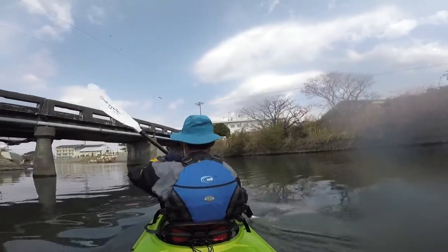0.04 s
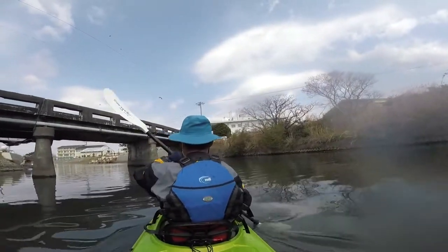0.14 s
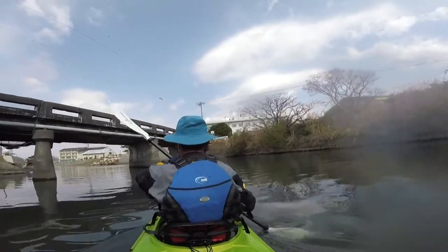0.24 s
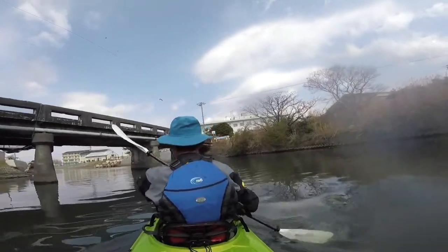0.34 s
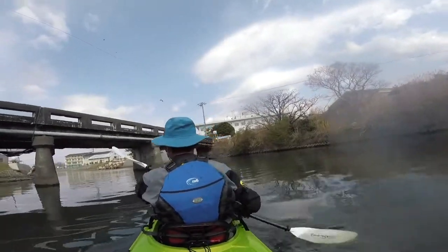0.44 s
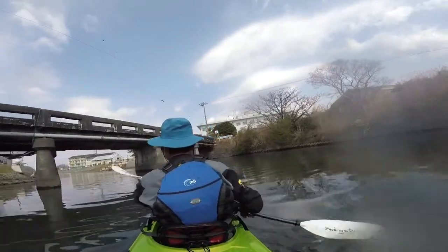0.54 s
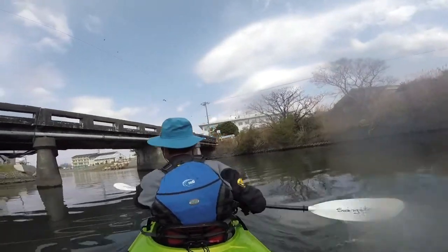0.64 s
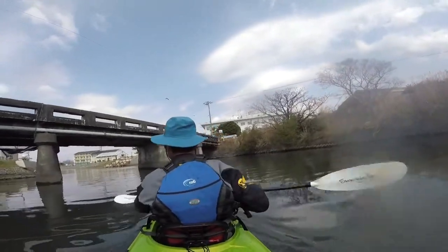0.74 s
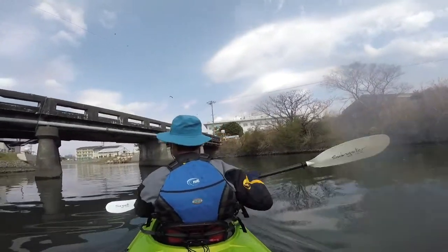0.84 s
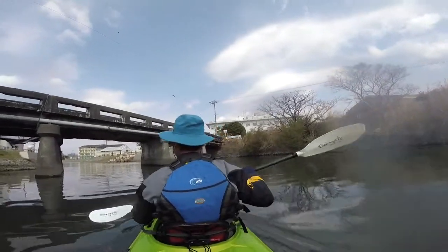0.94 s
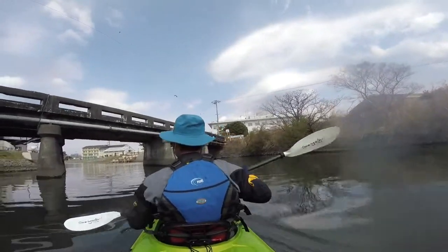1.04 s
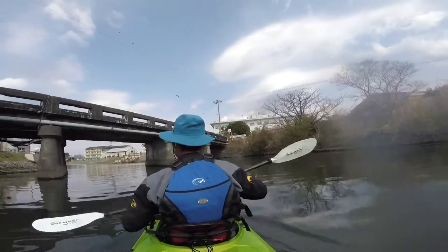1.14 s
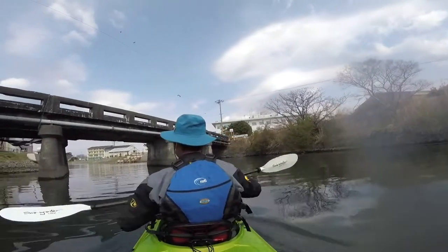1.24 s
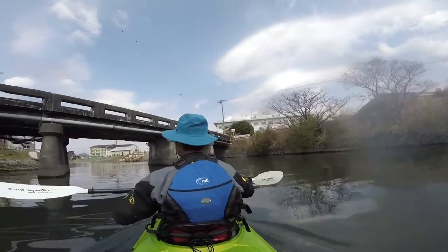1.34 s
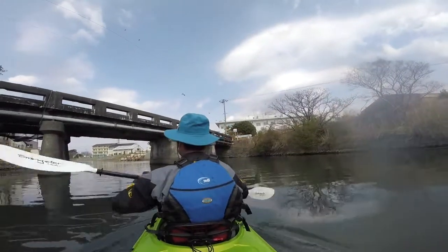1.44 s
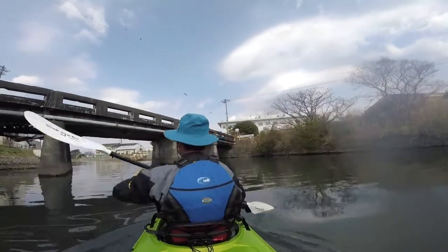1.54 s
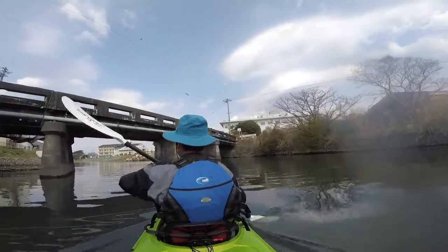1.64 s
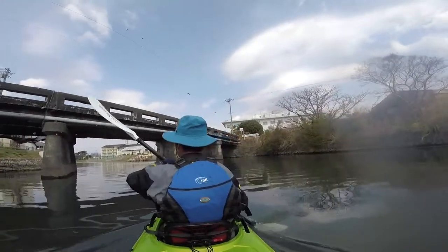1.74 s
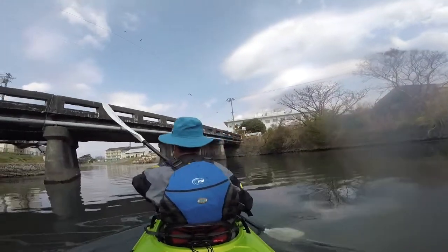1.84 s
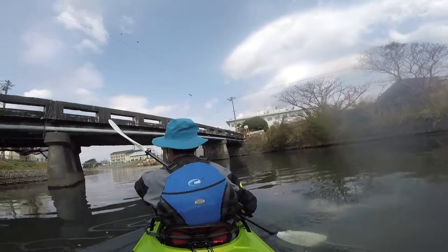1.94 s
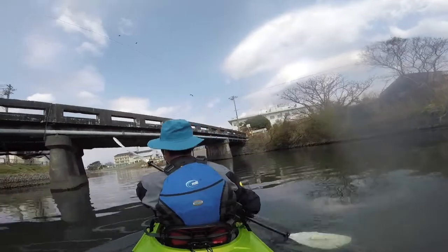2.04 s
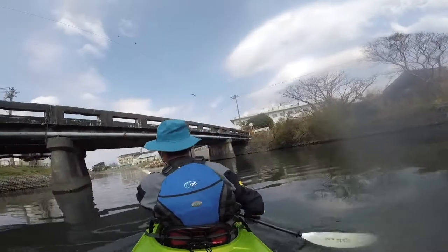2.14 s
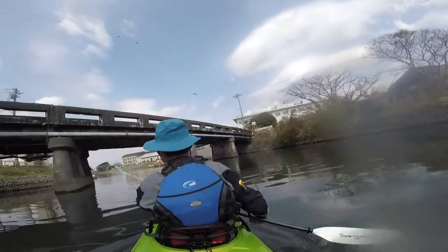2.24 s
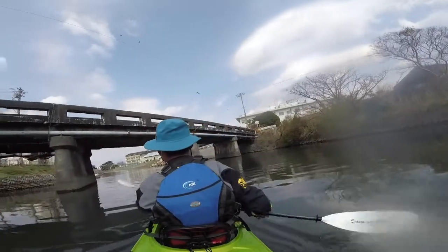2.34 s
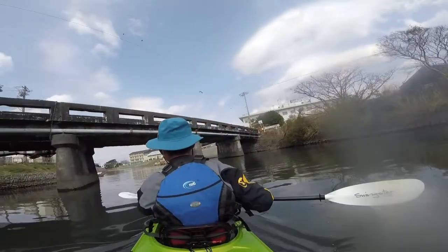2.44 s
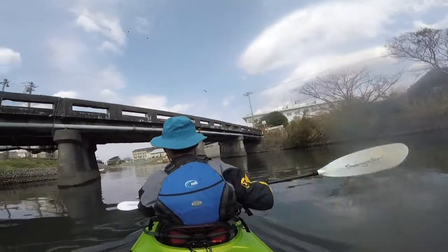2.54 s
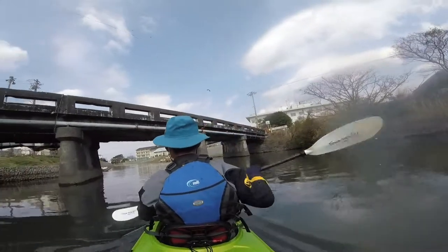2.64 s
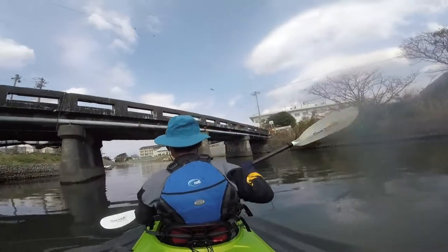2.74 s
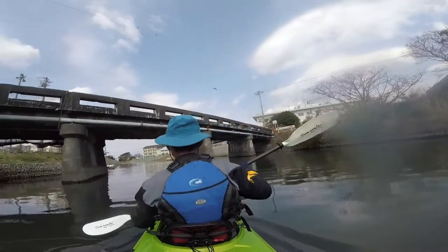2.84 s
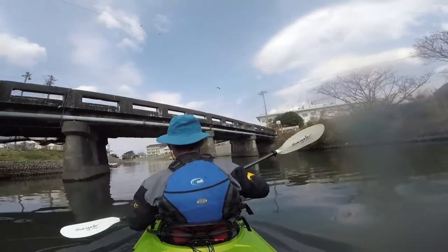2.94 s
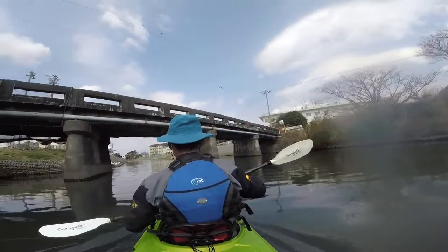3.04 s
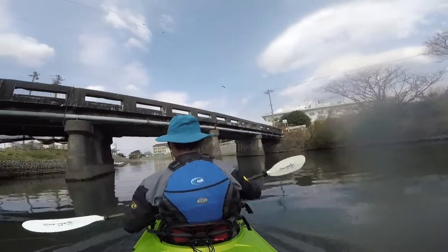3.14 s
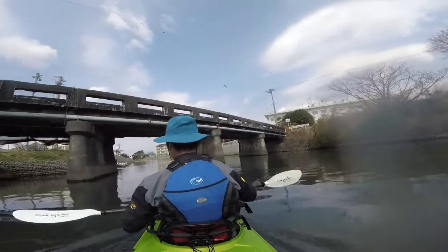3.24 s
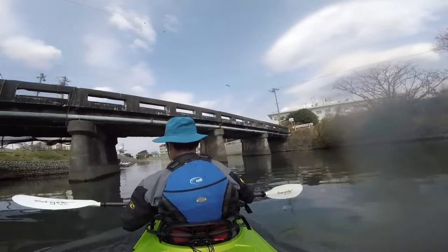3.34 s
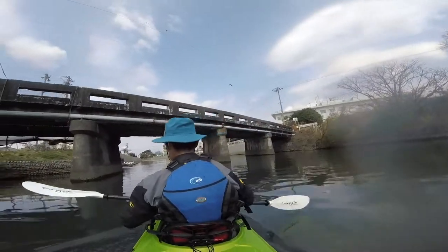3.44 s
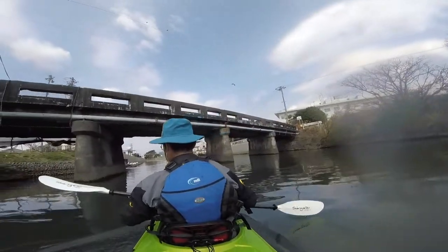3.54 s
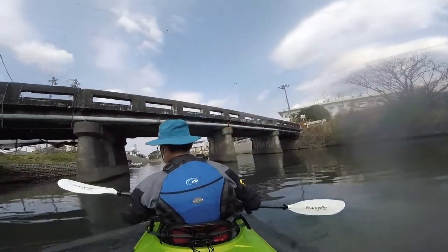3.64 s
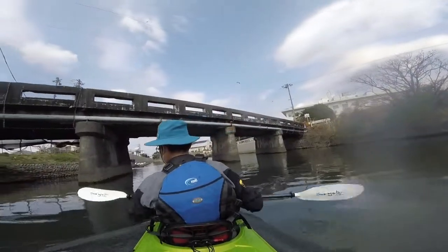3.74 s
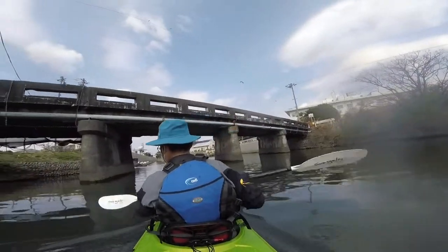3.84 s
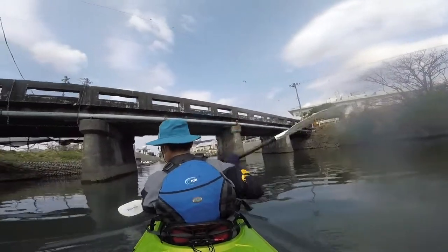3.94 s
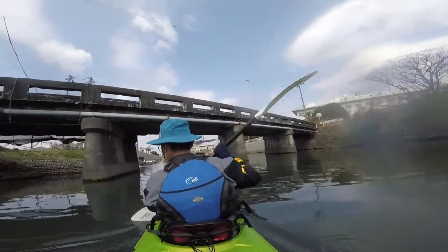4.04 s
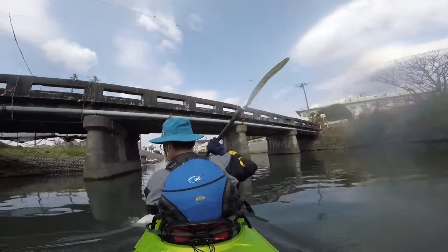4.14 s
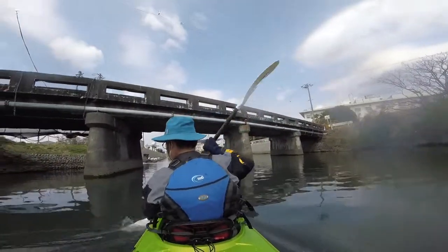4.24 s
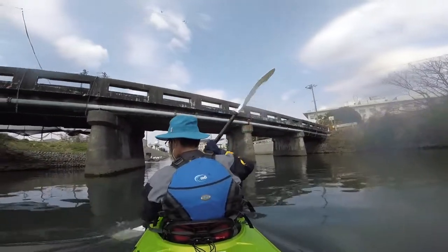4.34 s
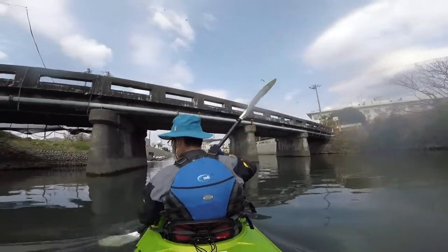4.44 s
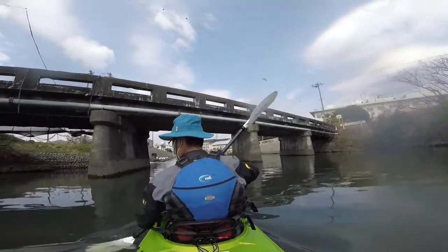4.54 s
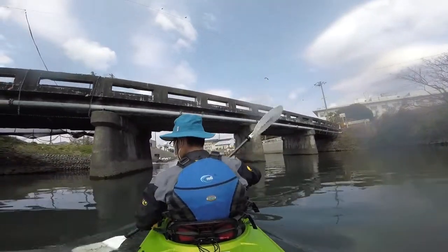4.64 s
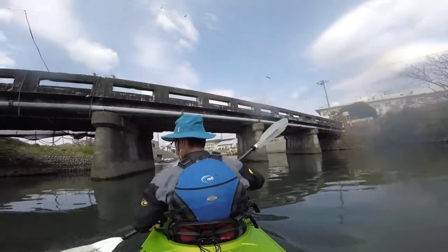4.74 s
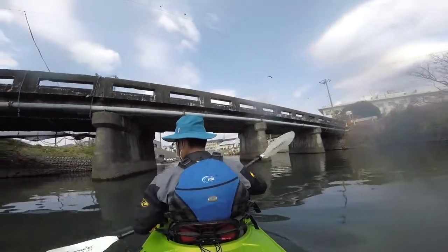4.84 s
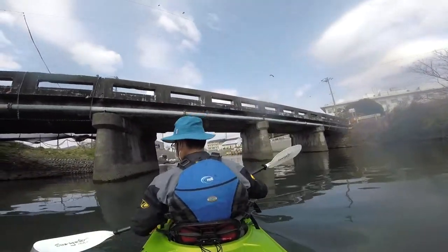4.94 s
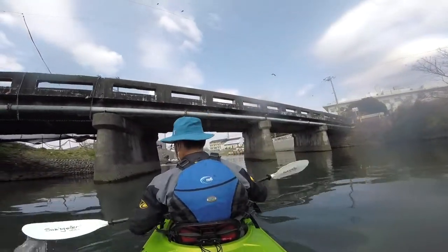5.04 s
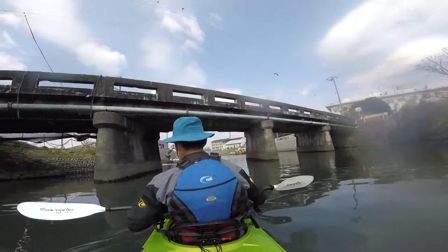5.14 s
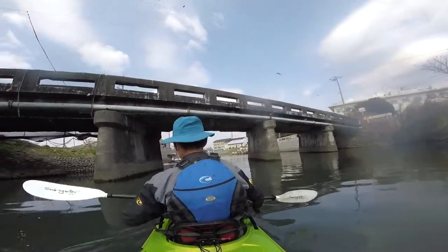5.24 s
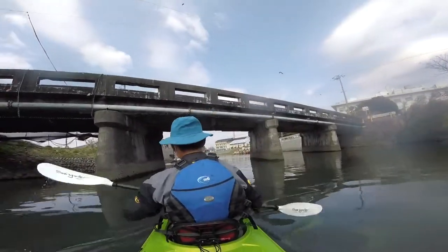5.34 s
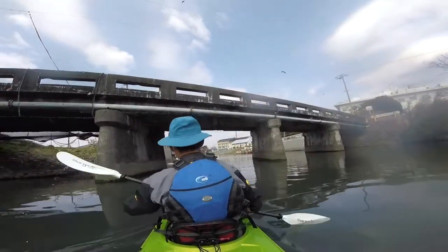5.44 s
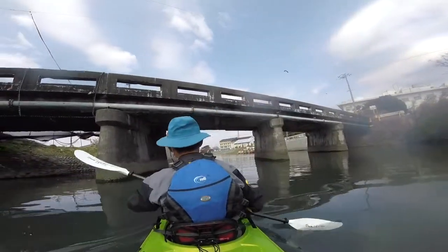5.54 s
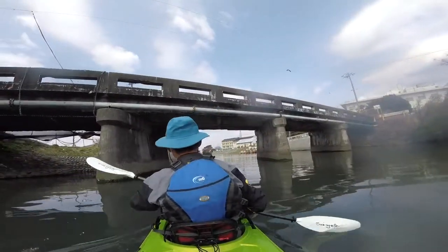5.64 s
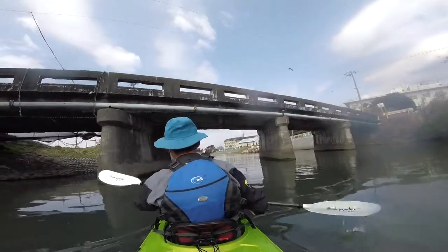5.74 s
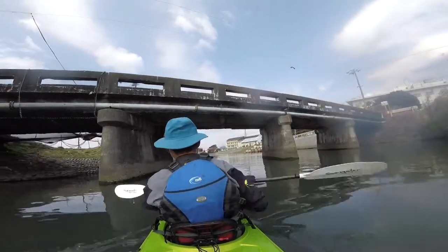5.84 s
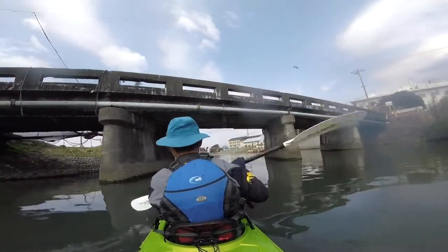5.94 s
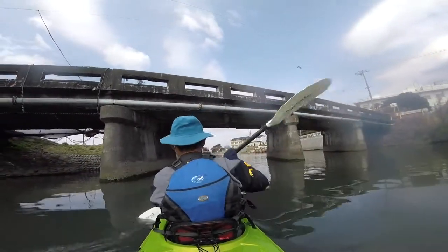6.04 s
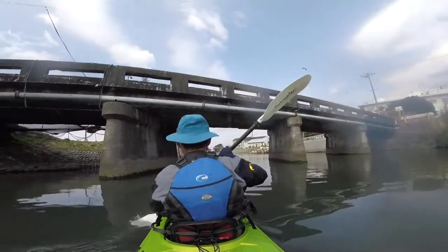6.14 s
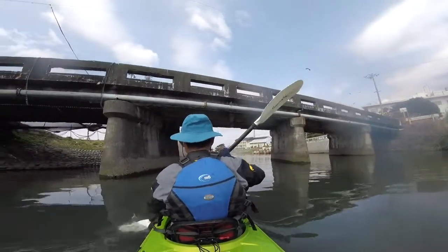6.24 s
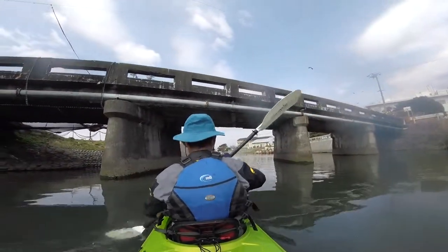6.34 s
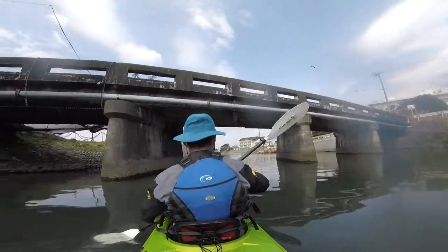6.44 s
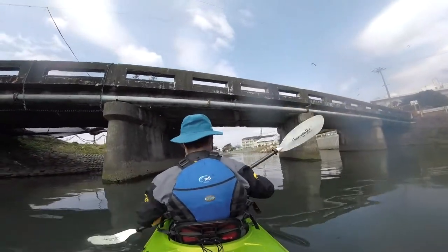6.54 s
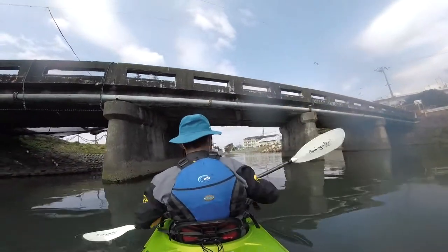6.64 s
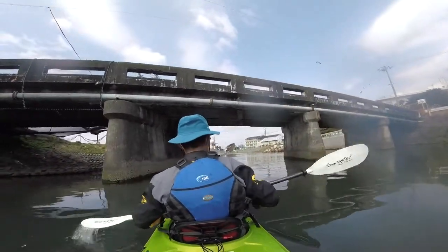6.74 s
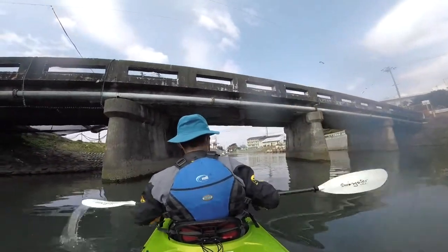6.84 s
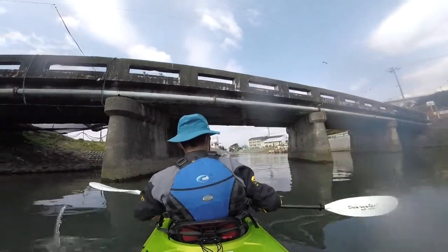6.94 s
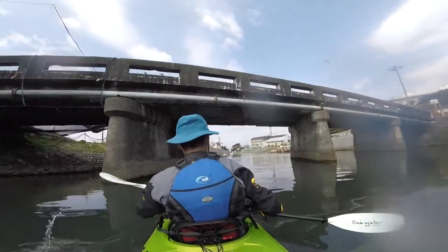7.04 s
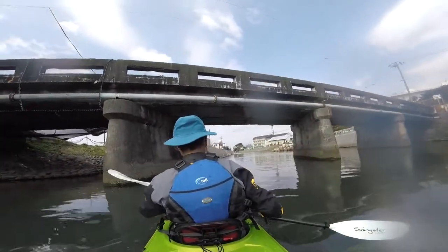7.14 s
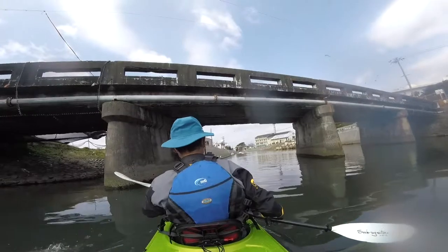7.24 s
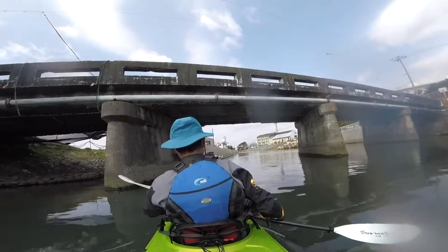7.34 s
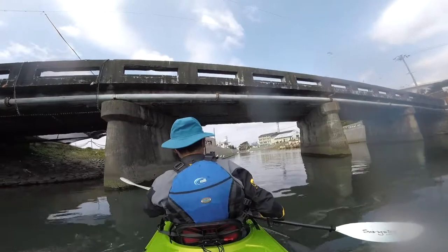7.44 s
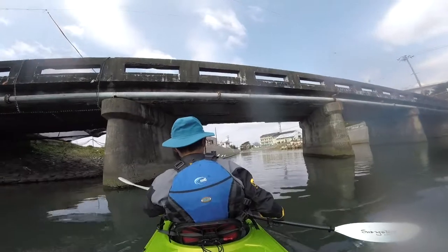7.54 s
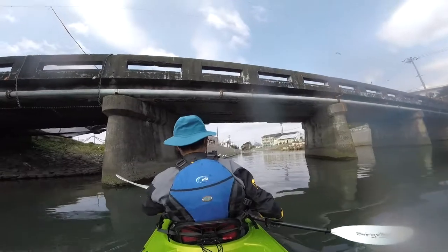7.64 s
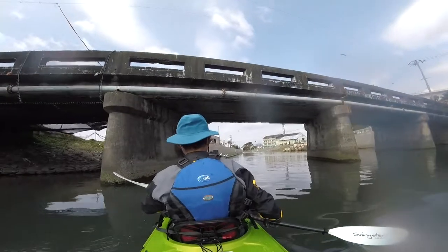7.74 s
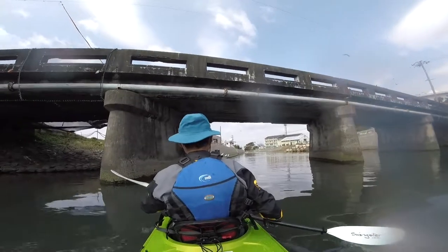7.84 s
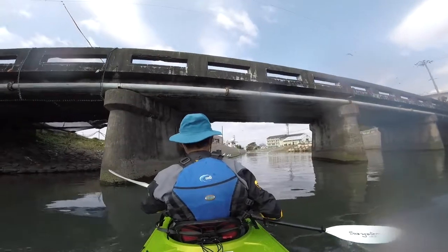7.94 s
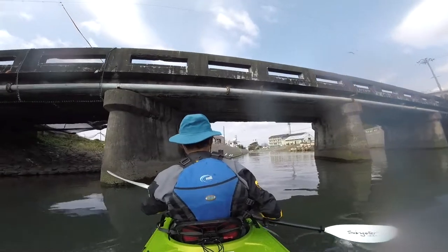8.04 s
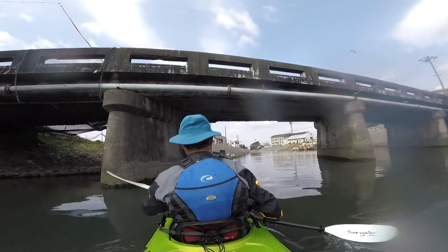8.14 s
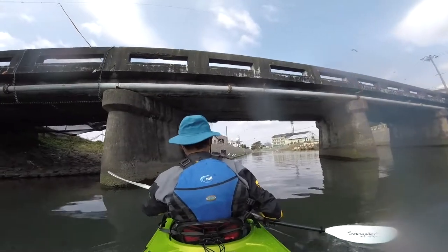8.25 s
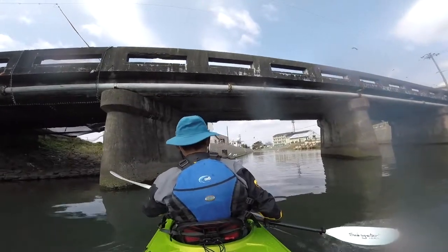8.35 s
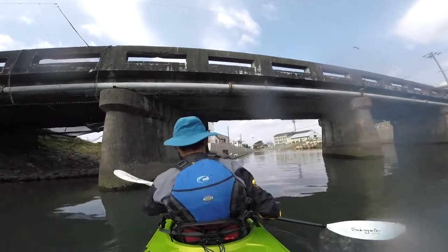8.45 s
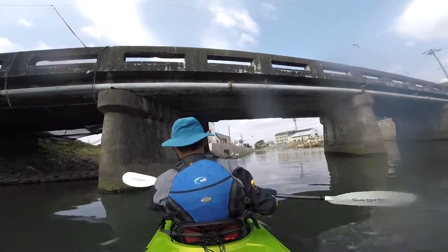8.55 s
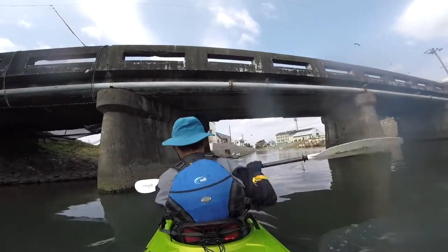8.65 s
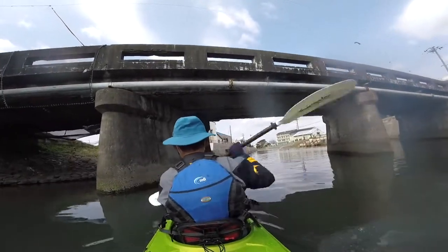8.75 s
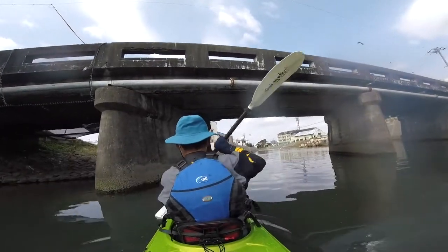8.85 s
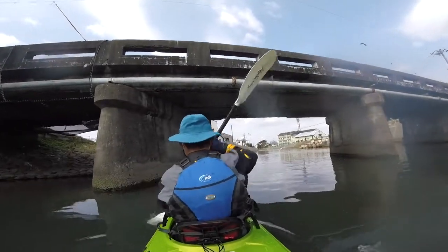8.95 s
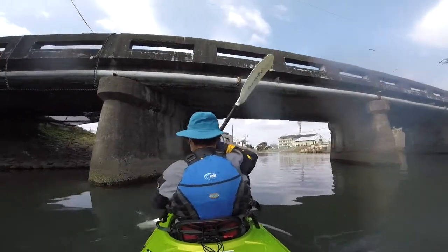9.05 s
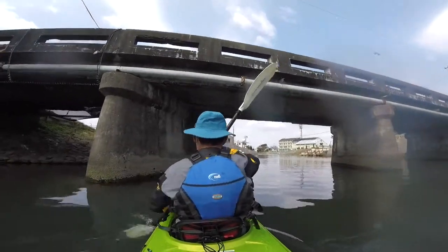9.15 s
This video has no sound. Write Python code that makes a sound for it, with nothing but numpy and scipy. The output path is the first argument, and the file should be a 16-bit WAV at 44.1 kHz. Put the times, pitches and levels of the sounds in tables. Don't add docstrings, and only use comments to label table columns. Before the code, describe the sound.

A kayak glides on a calm river, its hollow plastic hull thumping and knocking in bursts among gurgles, drips, light paddle splashes and wind rumble.

```python
import sys
import numpy as np
from scipy import signal
from scipy.fft import rfft, irfft, next_fast_len
from scipy.io import wavfile
from scipy.ndimage import uniform_filter1d

SR = 44100
rng = np.random.default_rng(int(sys.argv[2]) if len(sys.argv) > 2 else 0)


def volts(x):
    e = np.asarray(x, float) / 20
    return 10 ** e


def generate_wav(sig):
    pcm = np.round(np.clip(np.atleast_2d(sig).T, -1, 1) * 32767).astype(np.int16)
    wavfile.write(sys.argv[1], SR, pcm)


N = 406161


def rms_one(x):
    return x / np.sqrt(np.mean(x ** 2) + 1e-20)


def drift(rate_hz):
    r = np.exp(-80 * np.pi * rate_hz / SR)
    slow = signal.lfilter([1], [1, -2 * r, r * r], rng.standard_normal(N // 40 + 2002))[2000:]
    return np.interp(np.arange(N) / 40, np.arange(len(slow)), rms_one(slow))


def ring(clicks, hz, t60_s):
    r, w = volts(-60 / (t60_s * SR)), 2 * np.pi * hz / SR
    return signal.lfilter([0, np.sin(w)], [1, -2 * r * np.cos(w), r * r], clicks + 1e-18)


def add(out, s, sound):
    i = max(round(s * SR), 0)
    out[i:i + len(sound)] += sound[:N - i]


def coloured(x, spectrum):
    size = next_fast_len(N)
    hz, db = np.transpose(spectrum)
    bin_hz = np.arange(size // 2 + 1) * SR / size
    gain = volts(np.interp(np.log(bin_hz + 1), np.log(hz), db, -90, -90))
    return rms_one(irfft(rfft(x, size) * gain, size)[:N])


def patchy(spectrum, low_hz, count, shared_db, own_db, rate_hz):
    out, together, white = 0, drift(rate_hz), rng.standard_normal((2, N))
    for k, low in enumerate(low_hz * 2 ** (np.arange(count) / 2)):
        high = min(low * np.sqrt(2), .48 * SR)
        sos = signal.butter(2, [low, high], "band", fs=SR, output="sos")
        flicker_db = shared_db * together + own_db * drift(2 * rate_hz)
        out = out + signal.sosfilt(sos, white[k % 2]) * volts(flicker_db)
    return coloured(out, spectrum)


def grains(per_s, spread_db, low_hz, high_hz, cycles):
    sizes = volts(spread_db * np.minimum(rng.exponential(1, N), 4)) * rng.choice([-1, 1], N)
    born = rng.random(N) < per_s * volts(5 * drift(8)) / SR
    dealt = rng.integers(0, 10, N)
    out = 0
    for k, hz in enumerate(np.geomspace(low_hz, high_hz, 10)):
        out = out + ring(sizes * born * (dealt == k), hz, cycles / hz)
    return out


def in_time(rows):
    s, *columns = np.transpose(rows)
    lasts = s[-1] > N / SR - .1
    return [np.interp(np.arange(N) / SR, s, c, -99, c[-1] if lasts else -99) for c in columns]


def swells(calm_db, rows):
    t, power = np.arange(0, N, 32) / SR, volts(2 * calm_db)
    for s, db, rise, fade in rows:
        power = power + volts(2 * (db - 12 * np.maximum((s - t) / rise, (t - s) / fade)))
    return np.interp(np.arange(N) / SR, t, 10 * np.log10(power))


# (time [s], peak level [dB], pitch [Hz], t60 [s])
THUMPS = [(1.693, -1.5, 216.6, 0.086), (1.719, -20, 300.5, 0.23), (1.791, -17.5, 349, 0.18),
          (1.925, -20.5, 148, 0.2), (4.102, -4.5, 268, 0.14), (4.139, -21.5, 298.6, 0.23),
          (4.354, -10.5, 274.4, 0.23), (4.384, -8, 270, 0.094), (4.424, -18, 182, 0.1),
          (4.468, -10.5, 345, 0.066), (4.515, -3.5, 245.4, 0.12), (4.539, -4, 284, 0.08),
          (4.795, -15, 352, 0.095), (6.087, -11.5, 275, 0.063), (6.104, -18, 337, 0.17),
          (6.143, -22.5, 336, 0.2), (6.225, -12.5, 304, 0.073), (6.439, -13.5, 325, 0.071),
          (6.591, -17.5, 228, 0.16), (6.757, -4.5, 240, 0.048), (8.84, -15, 144.5, 0.16),
          (8.851, 1, 201, 0.096), (8.871, -5, 288, 0.094), (8.884, -6.5, 250, 0.051),
          (8.91, -14, 224.6, 0.17), (9.029, 4, 195, 0.045), (9.044, -4, 198, 0.085),
          (9.064, -16, 196, 0.025), (9.095, -8, 189, 0.054), (9.123, -7, 326, 0.071)]
# (time [s], peak level [dB], pitch [Hz])
LAPS = [(0.042, -24.5, 270), (0.764, -24.5, 377), (0.855, -16.5, 313), (0.992, -21, 324),
        (1.164, -21.5, 207.5), (1.268, -26, 162.5), (1.356, -26, 168), (1.453, -20.5, 211.4),
        (1.519, -22.5, 209.5), (2.528, -24.5, 286), (4.599, -18, 311), (5.171, -35, 233), (5.194, -27, 285),
        (6.908, -25.5, 230), (7.007, -23, 316), (6.578, -19.5, 229.3), (6.742, -20, 243),
        (9.204, -16.5, 436)]
# (frequency [Hz], density [dB per Hz])
FROTH = [(240, -23), (400, 6.5), (588, -4), (980, -2), (1110, -10), (1480, -14.5), (4000, -49.5),
         (5200, -89.5), (8800, -120)]


def thumps():
    out, churn, t = np.zeros(N), np.zeros(N), np.arange(SR // 3) / SR
    lap_cycles = 37.3
    surges = THUMPS + [(s, db, hz, lap_cycles / hz) for s, db, hz in LAPS]
    for (s, db, hz, t60), (detune, phase) in zip(surges, rng.uniform(-0.78, 1, (len(surges), 2))):
        near_hz = hz * (.8 + 0.071 * detune if hz > 255 else 1.2 + 0.047 * detune)
        tone = np.sin(2 * np.pi * hz * (t + .12 * t ** 2 / t60))
        tone += 0.58 * np.sin(2 * np.pi * near_hz * t + np.pi * phase)
        tone += 0.18 * np.sin(2 * np.pi * HULL_MODES[0][0] * t)
        rise = (1 - np.exp(-t / 0.0036)) ** 2
        add(out, s - .006, volts(db + 5.0) * tone * rise * volts(-60 * t / t60))
        add(churn, s - .006, volts(db - 60 * t / (1.21 * t60)) * rise)
    low_spectrum = [(110, -13.0), (160, -2.0), (330, 1.5), (400, -32.0), (700, -59)]
    low = coloured(rng.standard_normal(N), low_spectrum)
    froth = coloured(grains(900, 1.4, 490, 3600, 2.9), FROTH)
    return out + churn * (volts(-3.0) * low + volts(-14.5) * froth)


# (time [s], peak level [dB], pitch [Hz], housing rattle [dB])
KNOCKS = [(1.68, -20, 507, -33), (1.711, -9.5, 794, -38), (1.726, -16, 815, -52), (1.809, -28, 840, -50),
          (1.912, -29.5, 940, -52), (4.097, -21, 900, -53), (4.354, -23, 626, -44), (4.385, -9, 870, -35.5),
          (4.471, -19, 860, -38.5), (4.51, -17, 610, -34), (4.534, -28, 837, -34), (4.796, -23, 640, -51),
          (5.195, -23, 573, -53), (6.089, -21, 790, -52), (6.104, -10, 490, -56), (6.22, -17.5, 494, -62),
          (6.44, -19, 523, -51), (6.559, -25, 790, -52), (6.753, -22.5, 744, -64), (7.01, -18, 844, -52),
          (8.846, -19, 790, -50), (8.868, -11, 860, -38), (8.949, -7.5, 910, -36), (8.968, -10.5, 990, -44),
          (9.02, -23, 930, -46), (9.035, -10.5, 686, -35.5), (9.048, -6, 630, -38), (9.067, -13, 960, -50),
          (9.12, -9.5, 846, -39.5), (9.205, -18.5, 500, -54)]
# (frequency [Hz], level [dB], t60 [s])
SHELL = [(563, -3, 0.023), (794.5, -7.5, 0.05), (948, -5.5, 0.022), (1177, -16.5, 0.017),
         (1545, -15, 0.022)]
# (frequency [Hz], level [dB], t60 [s])
HOUSING = [(2200, 3, .014), (2900, 3, .009), (3500, 4, .013), (5050, -14, .025), (6400, -20, .01)]


def knocks():
    out, t = np.zeros(N), np.arange(SR // 8) / SR
    froth = coloured(rng.standard_normal(N), FROTH)
    for (s, db, hz, rattle_db), luck in zip(KNOCKS, rng.standard_normal((len(KNOCKS), 10))):
        sound = volts(db + 2.5 - 60 * t / 0.036) * np.sin(2 * np.pi * hz * t)
        sound += volts(db - 7.0 - 60 * t / 0.062) * np.resize(froth[round(s * SR):], len(t))
        for (mode_hz, mode_db, t60), u in zip(SHELL, luck):
            level = volts(db + mode_db + 3.5 * u - 60 * t / t60)
            sound += level * np.sin(2 * np.pi * mode_hz * (1 + 0.046 * u) * t)
        for (mode_hz, mode_db, t60), u in zip(HOUSING, luck[5:]):
            level = volts(rattle_db + mode_db + 3 + 3.5 * u - 60 * t / t60)
            sound += level * np.sin(2 * np.pi * mode_hz * t)
        add(out, s - .0005, sound * (1 - np.exp(-t / 0.0004)) ** 2)
    return out


# (time [s], peak level [dB],
# pitch [Hz], t60 [s])
GURGLES = [(0.172, -26.5, 292, 0.12), (0.591, -25.5, 317, 0.14), (4.2, -28, 149, 0.19),
           (4.36, -19, 152, 0.25), (6.338, -25.5, 320, 0.082), (7.816, -26, 322, 0.077),
           (8.606, -25, 245, 0.22), (8.776, -25, 330, 0.056), (0.043, -13, 235, 0.036),
           (1.697, -26, 1290, 0.052), (1.746, -21.5, 815, 0.089), (1.792, -20, 818, 0.09),
           (1.82, -21.5, 820, 0.043), (1.875, -22, 610, 0.047), (4.066, -16.5, 1680, 0.024),
           (4.094, -13, 302, 0.037), (4.108, -18.5, 1070, 0.037), (4.125, -22, 870, 0.041),
           (4.205, -28.5, 690, .08), (4.324, -35, 1180, 0.027), (4.404, -17, 820, 0.039),
           (4.46, -24, 810, 0.036), (4.513, -4, 1280, 0.014), (4.545, -21, 804, 0.066),
           (4.566, -22, 330, .05), (4.607, -27, 910, 0.023), (6.071, -15.5, 297, 0.063),
           (6.09, -15, 805, 0.061), (6.107, -29, 1880, .03), (6.114, -12.5, 657, 0.061),
           (6.14, -22, 800, .04), (6.168, -30, 805, 0.045), (6.191, -24, 843, 0.075),
           (6.193, -17.5, 336, 0.11), (6.235, -27, 1000, 0.026), (6.44, -28, 2160, 0.019),
           (8.843, -17, 590, 0.033), (8.866, -21, 640, .03), (8.884, -21, 905, 0.05),
           (8.908, -22, 850, 0.055), (8.907, -8.5, 326, 0.081), (8.947, -8, 371, 0.057),
           (8.97, -6, 397, 0.031), (8.995, -21.5, 790, 0.081), (8.998, -13, 330, 0.057),
           (9.037, -15, 420, 0.027), (9.056, -10.5, 964, 0.045), (9.092, -23, 843, 0.065),
           (9.133, -22.5, 874, 0.063), (9.172, -34, 900, 0.055)]


def gurgles():
    out, t = np.zeros(N), np.arange(SR // 6) / SR
    partner_ratio, partner_db, rise_s = 1.17, -5.5, 0.0019
    for s, db, hz, t60 in GURGLES:
        tone = np.sin(2 * np.pi * hz * t)
        tone += volts(partner_db) * np.sin(2 * np.pi * partner_ratio * hz * t)
        add(out, s - .001, volts(db - 60 * t / t60) * tone * (1 - np.exp(-t / rise_s)))
    return out


# (frequency [Hz], width [Hz], level [dB])
HULL_MODES = [(160.6, 33, 2.5), (222, 30, 3.5), (270, 170, 1), (306.8, 32, -1.5)]
# (time [s], hum level [dB], fade [s])
PULLS = [(0.84, -36, 0.47), (1.23, -26.5, 0.19), (1.76, -18.5, 0.2), (1.93, -28, 0.059), (4.15, -22, 0.093),
         (4.45, -34, 0.19), (6.16, -53, .12), (7.45, -40.5, 0.9), (0.4, -34, 0.37), (2.9, -40.5, .5),
         (8.93, -20.5, 0.32)]


def hull_hum():
    glide_db, rise_s = -41, 0.087
    level_db = swells(glide_db, [(s, db, rise_s, fade) for s, db, fade in PULLS])
    modes = 0
    for hz, width_hz, db in HULL_MODES:
        tone = rms_one(ring(rng.standard_normal(N), hz, 2.33 / width_hz))
        modes = modes + volts(db + 3.2 * drift(8.6)) * tone
    steep = signal.butter(6, [125, 380], "band", fs=SR, output="sos")
    return volts(level_db + 1.5 * drift(4.1)) * rms_one(signal.sosfilt(steep, modes))


# (time [s], wash level [dB], spray level [dB], fade [s])
SPLASHES = [(0.24, -42.5, -56.5, 0.11), (0.36, -42, -53.5, 0.07), (0.495, -31, -57, 0.064),
            (0.565, -40.5, -54, 0.29), (0.838, -32, -42, 0.13), (1.12, -44.5, -57.5, 0.97),
            (1.69, -39, -56, 0.027), (1.81, -45, -58.5, 0.26), (2.2, -38.5, -51, 0.24),
            (2.532, -39, -47.5, 0.14), (2.95, -49, -66, 0.11), (3.45, -47, -59, 0.35),
            (4.097, -34.5, -47.5, 0.074), (4.38, -56, -59, 0.2), (4.52, -37, -58, 0.043),
            (5.18, -73, -60, 0.25), (5.81, -43, -54, 0.17), (6.031, -58, -47, 0.071),
            (6.09, -37, -84, 0.054), (6.52, -46, -61.5, 0.4), (7.06, -40, -48, 0.23),
            (7.51, -36.5, -56, 0.14), (7.88, -41, -52.5, 1), (8.632, -39, -48, 0.22),
            (8.825, -31, -42.5, 0.071), (9.05, -28, -61, 0.008), (9.2, -42, -76, 0.095)]


def splash_levels():
    calm_wash_db, calm_spray_db, rise_share = -45, -61.5, 0.91
    wash_db = swells(calm_wash_db, [(s, db, rise_share * fade, fade) for s, db, _, fade in SPLASHES])
    spray_db = swells(calm_spray_db, [(s, db, rise_share * fade, fade) for s, _, db, fade in SPLASHES])
    return wash_db, spray_db


# (frequency [Hz], density [dB per Hz])
WASH = [(220, -25), (380, -1), (460, -2), (519, -4.5), (942, -3), (1400, -6), (3000, -15.5), (3900, -27.5),
        (6600, -120)]


def wash(level_db):
    noise = patchy(WASH, 365.0, count=7, shared_db=0.0, own_db=1.0, rate_hz=8.7)
    bubbles = coloured(grains(250, 3.5, 600, 3200, 10), WASH)
    return volts(level_db - 3.5) * rms_one(noise + 1.25 * bubbles)


# (frequency [Hz], density [dB per Hz])
SPRAY = [(1290, 7.5), (2200, 4), (2400, 4.5), (3990, -0.5), (4640, -4), (6510, -4), (10500, -14),
         (15000, -33)]


def spray(level_db):
    noise = patchy(SPRAY, 1900, count=6, shared_db=1.5, own_db=4.5, rate_hz=38)
    per_s = 500 * volts(.7 * (level_db + 50))
    bubbles = coloured(grains(per_s, 4.0, 1800, 10500, 12), SPRAY)
    return volts(level_db + 3.0) * rms_one(noise + bubbles)


def chirps(level_db):
    out, t = np.zeros(N), np.arange(SR // 25) / SR
    gap_s, centre_hz, spread_octaves, cycles, rise_share = .006, 1350, .55, 11, .35
    gap, size, tone, rise = rng.standard_normal((1500, 4)).T
    times = np.cumsum(gap_s * np.exp(.8 * gap))
    for s, db, octaves, climb in zip(times, 3.2 * size, spread_octaves * tone, rise_share * abs(rise)):
        if s < N / SR:
            hz = centre_hz * 2 ** octaves
            life = cycles / hz
            sound = np.sin(2 * np.pi * hz * (t + climb * t ** 2 / life)) * (1 - np.exp(-t / 0.0016))
            add(out, s, volts(level_db[int(s * SR)] + db - 3 * octaves - 30 * t / life) * sound)
    return out


# (start [s], end [s], level [dB])
TRICKLES = [
    (0.4, 1.0, -34),
    (2.047, 3.6, -36.5),
    (5.005, 6.05, -57),
    (6.896, 8.8, -33),
]


def drips():
    gap_s, centre_hz, spread_octaves, spread_db = .16, 800, 0.53, 2.5
    rows = []
    for start, end, db in TRICKLES:
        gap, size, tone = rng.standard_normal((40, 3)).T
        times = start + np.cumsum(gap_s * np.exp(.5 * gap))
        pitches = centre_hz * 2 ** (spread_octaves * tone)
        rows += [row for row in zip(times, db + spread_db * size, pitches) if row[0] < end]
    return rows


# (time [s], peak level [dB], pitch [Hz])
DROPS = [(0.04, -20.5, 449), (0.35, -27, 910), (0.478, -25, 740), (0.76, -26, 460), (0.984, -23, 563),
         (1.563, -24, 2180), (2.12, -29, 1050), (2.209, -26, 864), (2.467, -25.5, 1180), (2.511, -30, 504),
         (2.655, -28.5, 1774), (2.792, -25.5, 984), (2.915, -24.5, 880), (2.969, -29, 850),
         (3.023, -30, 605), (3.451, -26.5, 540), (3.726, -25.5, 610), (3.962, -29, 537),
         (4.042, -27.5, 584), (4.068, -29, 1740), (5.799, -21.5, 1430), (7.06, -24, 1360),
         (6.906, -26.5, 438), (7.416, -26, 604), (7.598, -19, 1044), (8.257, -23, 1830),
         (8.652, -23.5, 830), (8.798, -19.5, 1200), (8.841, -20, 524)]
# (time [s], peak level
# [dB], pitch [Hz])
MORE_DROPS = [(2.8, -34, 740), (3.105, -32, 620), (4.9, -38, 980), (3.435, -34, 536), (2.878, -34, 560),
              (2.2, -32, 740), (3.1, -35, 1900), (3.61, -33, 2140), (4.1, -16, 3560), (3.1, -30, 1350),
              (8.909, -31, 4700), (8.909, -30, 3000), (4.6076, -38, 2600), (4.616, -38, 3200),
              (4.7259, -38, 1850), (4.7523, -31.5, 2100), (3.1, -33, 2900), (4.874, -34, 2450),
              (4.9518, -40, 2300), (1.9, -24, 2300), (1.5, -33, 3700)]
# (time [s], level [dB], start pitch [Hz], rise share)
GLIDES = [
    (2.798, -55, 900, 0.33),
    (3.017, -37.5, 686, 2.5),
    (3.699, -40, 1090, 0.83),
    (7.133, -29, 1220, 0.76),
    (7.4, -39, 370, 1.6),
    (5.6, -52, 1250, 0.35),
]


def drops():
    out, t = np.zeros(N), np.arange(SR // 8) / SR
    for s, db, hz in DROPS + MORE_DROPS + drips():
        t60 = 0.0092 + 30 / hz
        turns = 0.99 * hz * (t + 0.04 * t ** 2 / t60)
        add(out, s - .002, volts(db + 2 - 60 * t / t60) * np.sin(2 * np.pi * turns) * (1 - np.exp(-t / 0.0026)))
    for s, db, hz, rise in GLIDES:
        life = 0.0073 + 0.019 * rise
        tone = np.sin(2 * np.pi * hz * (t + rise * t ** 3 / 3 / life ** 2))
        add(out, s, volts(db) * tone * np.sin(np.pi * np.minimum(t / life, 1)))
    return out


# (time [s], peak level [dB], pitch [Hz])
TICKS = [(0.242, -40, 6740), (0.243, -17, 2150), (0.4167, -26, 3170), (0.8, -23, 2400),
         (0.905, -25.5, 3480), (1.6799, -28, 3200), (2.4825, -26, 3600), (2.53, -21.5, 4000),
         (2.981, -29.5, 3680), (4.0675, -18.5, 2280), (4.08, -36, 6470), (4.379, -33, 3480),
         (4.5096, -22, 3540), (4.503, -39, 3820), (5.9125, -33, 5660), (5.9227, -30.5, 5500),
         (5.9855, -27.5, 3660), (6.036, -27.5, 3440), (7.059, -24.5, 3080), (7.23, -32.5, 6160),
         (7.3922, -32, 3230), (7.43, -37, 3330), (8.531, -29.5, 6200), (8.75, -29, 3500),
         (8.7723, -25, 3300), (8.8067, -19, 3580), (0.471, -26, 2790), (0.7477, -30.5, 3440),
         (0.8859, -29, 3590), (1.1109, -30.5, 3000), (9.021, -36.5, 5500), (1.807, -32, 2530),
         (1.934, -28, 2070), (1.963, -34, 2300), (2.1927, -34.5, 4050), (2.4284, -33, 3620),
         (2.4588, -34, 6240), (2.5925, -31, 3550), (2.7177, -34.5, 3960), (2.7536, -35.5, 6400),
         (5.1512, -35, 7160), (5.195, -37, 6000), (5.225, -40.5, 6500), (7.0584, -28, 6570),
         (7.093, -29.5, 3900), (7.13, -38, 7000), (7.152, -26, 2300), (7.43, -33.5, 6650),
         (7.4659, -38, 8650), (7.5033, -33, 3640), (7.6, -34, 3960), (7.8052, -33, 3170),
         (7.9249, -32, 3610), (3.4, -33, 1900), (8.0436, -34, 3400), (8.638, -24.5, 2840),
         (8.6787, -30, 3150), (8.7919, -32, 3240), (4.5662, -40, 2500)]


def ticks():
    out, t = np.zeros(N), np.arange(400) / SR
    bright = signal.butter(2, [1500, 9000], "band", fs=SR, output="sos")
    for (s, db, hz), snap in zip(TICKS, rng.standard_normal((len(TICKS), 400))):
        sound = 0.84 * np.sin(2 * np.pi * hz * t) + 0.43 * signal.sosfilt(bright, snap)
        add(out, s - .0005, volts(db - 60 * t / 0.011) * sound * (1 - np.exp(-t / 0.0001)))
    return out


# (time [s], peak level [dB])
SPECKS = [(0.2426, -46), (0.7706, -44), (0.9033, -46), (1.4426, -37), (4.0672, -35), (4.5096, -34),
          (7.0633, -43), (7.1137, -48), (7.231, -54), (7.4285, -45), (8.847, -44)]


def specks():
    out, t = np.zeros(N), np.arange(300) / SR
    bright = signal.butter(2, 3600, "high", fs=SR, output="sos")
    for (s, db), snap in zip(SPECKS, rng.standard_normal((len(SPECKS), 300))):
        add(out, s - .0005, volts(db - 60 * t / .012) * signal.sosfilt(bright, snap))
    return signal.lfilter([.4], [1, -.6], out)


# (time [s], level [dB], fade [s])
PUFFS = [
    (2.39, -37, 0.073),
    (2.68, -36, 0.081),
    (2.98, -30, 0.099),
    (3.38, -33, 0.096),
    (3.58, -37.5, 0.17),
    (3.76, -28.5, 0.17),
]


def cockpit_note():
    calm_db, rise_s = -49.5, 0.14
    level_db = swells(calm_db, [(s, db, rise_s, fade) for s, db, fade in PUFFS])
    note = rms_one(ring(ring(rng.standard_normal(N), 151, 0.25), 149.4, 0.25))
    return volts(level_db) * note / np.sqrt(uniform_filter1d(note ** 2, size=4000) + .1)


# (frequency [Hz], density [dB per Hz])
GUST = [(12, -38), (20, -4), (43, 4.5), (118, -5), (150, -19.5), (200, -17), (330, -120)]


def gust(level_db):
    return volts(level_db) * patchy(GUST, 17.73, count=7, shared_db=1.5, own_db=1.8, rate_hz=8)


# (frequency [Hz], density [dB per Hz])
HISS = [(880, -43), (1500, 0), (2160, -9.5), (4540, -16), (6550, -9), (9090, -12.5), (11700, -18),
        (13400, -19), (15330, -28)]


def hiss(hull):
    keep = np.exp(-1 / (.11 * SR))
    power = signal.lfilter([1 - keep], [1, -keep], hull ** 2)
    held_db = np.maximum(10 * np.log10(power + 1e-9) + 16.0, 0)
    return volts(-59 - 2.6 * held_db) * coloured(rng.standard_normal(N), HISS)


# (time [s], level [dB])
GUSTS = [(0.0, -67), (1.17, -65.5), (1.36, -42.5), (1.46, -33.5), (1.87, -15.5), (2.08, -32), (4.01, -42.5),
         (4.1, -38), (4.31, -33), (4.39, -23.5), (5.89, -39), (6.14, -29), (6.29, -37.5), (7.05, -38.5),
         (7.11, -48), (8.78, -65.5), (8.92, -23.5), (9.21, -28.5)]


def scene():
    gust_db, = in_time(GUSTS)
    wash_db, spray_db = splash_levels()
    hull = thumps() + knocks() + gurgles() + hull_hum() + cockpit_note()
    water = wash(wash_db) + spray(spray_db) + drops() + ticks()
    churn_db = 10 * np.log10(uniform_filter1d(hull ** 2, size=1500) + 1e-9)
    water += chirps(np.maximum(1.4 * wash_db + 24, churn_db - 14))
    membrane = signal.cheby2(6, 13, 11500, fs=SR, output="sos")
    outside = signal.sosfilt(membrane, hull + water)
    bass_cut = signal.cheby2(8, 44, 106, "high", fs=SR, output="sos")
    windy = np.clip((gust_db + 49.5) / 6.6, 0, 1)
    heard = windy * outside + (1 - windy) * signal.sosfilt(bass_cut, outside)
    return (gust(gust_db) + heard + hiss(hull) + specks())[None]


def roll_off(x):
    return signal.sosfilt(signal.butter(12, 15400, fs=SR, output="sos"), x)


def record(dry):
    rounded = dry / (1 + np.abs(dry / .95) ** 4) ** .25
    top_cut = signal.cheby2(12, 50, 15700, fs=SR, output="sos")
    return roll_off(signal.sosfilt(top_cut, rounded))


dry = scene()
out = record(dry)
generate_wav(out)
```